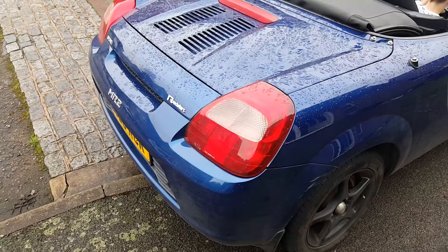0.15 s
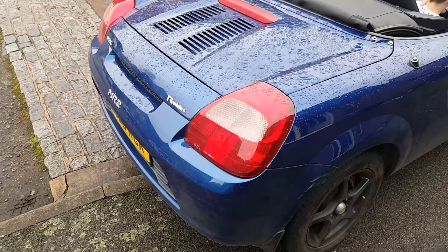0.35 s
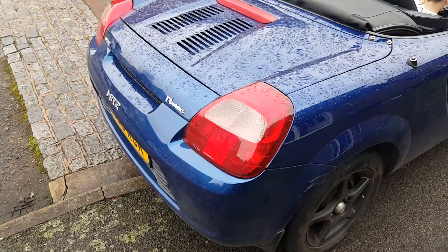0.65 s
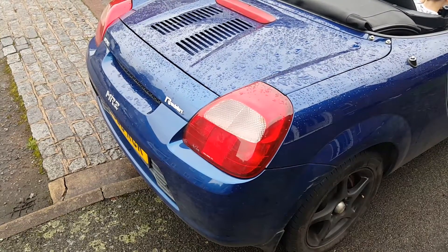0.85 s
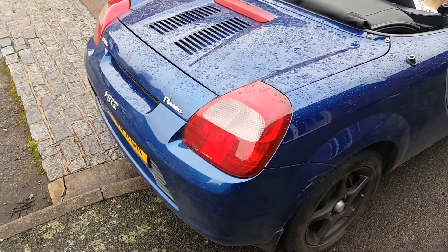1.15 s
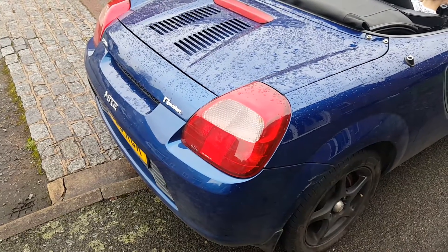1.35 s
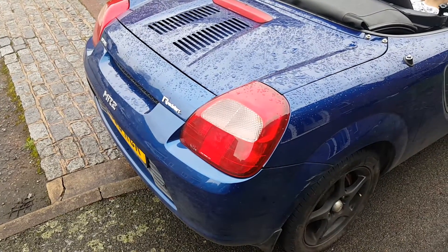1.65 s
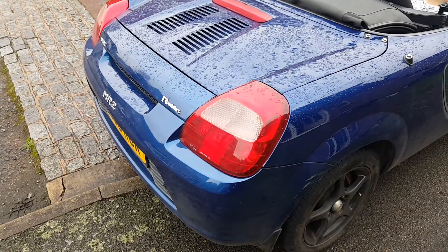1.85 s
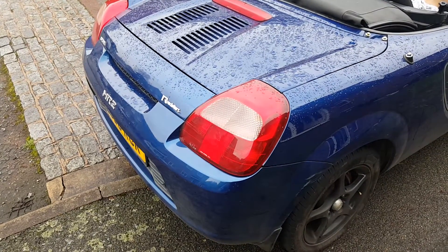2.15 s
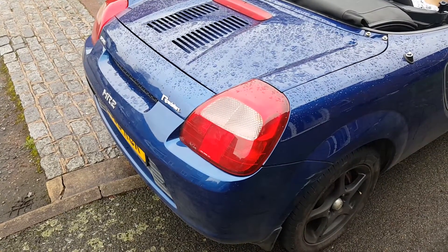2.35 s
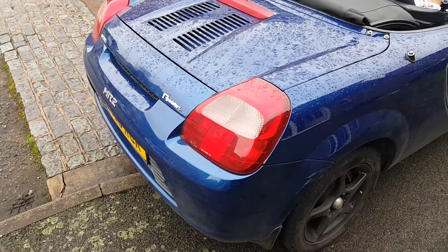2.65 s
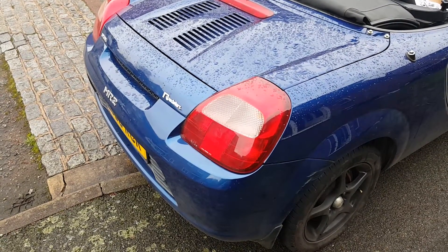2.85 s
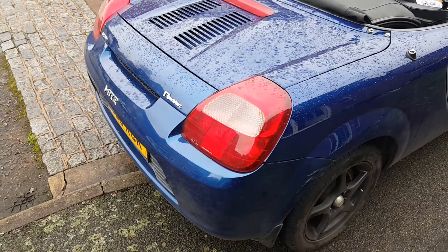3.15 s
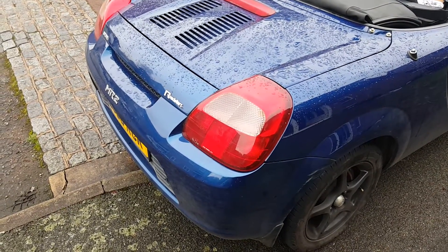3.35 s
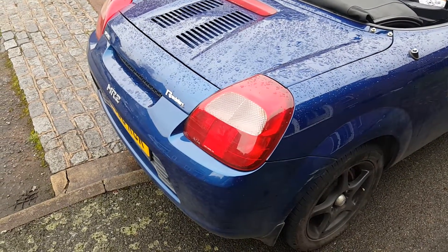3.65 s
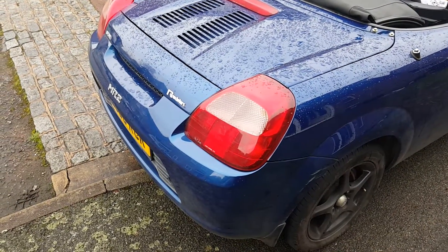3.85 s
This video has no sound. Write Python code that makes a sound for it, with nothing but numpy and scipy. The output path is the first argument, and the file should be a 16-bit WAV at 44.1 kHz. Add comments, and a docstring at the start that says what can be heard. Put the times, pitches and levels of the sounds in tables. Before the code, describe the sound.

A small car engine cranks briefly, starts and settles into an idle in a street.

```python
"""A small four-cylinder petrol engine starts in the street, heard from beside the car's tail.
First the fuel pump hums and runs down, the solenoid clacks and the starter churns through four
compressions. The engine catches with thuds and knocks, flares with a hiss of intake air, settles into
a loping idle, squeaks faintly and picks up a little. Its exhaust sounds harmonics of the crank's
rotation, echoed by kerb and house fronts; its valves excite the panels of the engine bay."""
import sys
import numpy as np
from scipy import signal
from scipy.fft import rfft, irfft
from scipy.io import wavfile
from scipy.ndimage import uniform_filter1d, map_coordinates

SR = 44100
rng = np.random.default_rng(int(sys.argv[2]) if len(sys.argv) > 2 else 0)


def pcm_store(signal):
    """Save signal as 16-bit PCM."""
    levels = np.round(np.clip(np.atleast_2d(signal), -1, 1) * 32767)
    wavfile.write(sys.argv[1], SR, levels.astype(np.int16).T)


N = 176400
T = np.arange(N) / SR
FFT_SIZE = 2 ** 18
HZ = np.maximum(np.fft.rfftfreq(FFT_SIZE, 1 / SR), 1)

# first uneven firings: (time [s], level [dB])
FIRST_FIRINGS = [(2.177, -1), (2.217, -2), (2.25, 3.5)]
# engine speed: (time [s], firing rate [1/s])
FIRING_RATE = [(2.299, 20.63), (2.42, 29.44), (2.5, 30.91), (2.68, 31.89), (2.9, 28.35), (3.15, 27.28),
               (3.45, 26.96), (3.83, 28.41), (4.0, 32.08)]
# spectrum of a metal impact: (frequency [Hz], level [dB])
IMPACT_SPECTRUM = [(80, -24), (350, 0), (700, -16), (1100, -8.5), (1600, 1.5), (2600, -5), (4500, -13),
                   (8000, -18.5), (15500, -32)]
# spectrum of intake air, brushes and ticks: (frequency [Hz], level [dB])
HISS_SPECTRUM = [(1500, 3), (3000, 1), (4300, -7), (5200, -1.5), (6500, -2.5), (8500, -2.5), (10200, -10.5),
                 (12500, -9), (15500, -14)]
# resonances of the engine bay's panels: (frequency [Hz], width [Hz], gain [dB])
PANEL_MODES = [(588, 106, 7), (817, 70, 10.5), (856, 74, -11), (948, 11, 8), (1180, 110, 8),
               (1368, 7.8, 11.5), (1558, 74, 9.5), (1900, 44, 5), (2004, 16, 10), (2680, 83, 1.5),
               (3166, 79, 9)]
# stereo image of the bay: (frequency [Hz], left minus right [dB], coherence [0-1])
BAY_STEREO = [(60, 0, 0.31), (200, 3.5, 1), (377, 0.5, 0.7), (664, 2.5, 1), (1390, 0, 0.44),
              (2480, 7.5, 0.13), (3900, -2, 0), (8500, 25.5, 0), (15000, 13.5, 0.12)]

STARTER_ON_S, STARTER_OFF_S, RUNNING_S = 1.56, 2.7, FIRING_RATE[0][0]
MEAN_FIRING_HZ = np.mean(np.array(FIRING_RATE)[:, 1])


def from_db(db):
    """Decibels to amplitude ratio."""
    return 10 ** (np.asarray(db) / 20)


def unit_rms(x):
    """Normalisation to unit power."""
    return x / np.sqrt(np.mean(x ** 2) + 1e-20)


def over_time(rows):
    """Linear interpolation of a table's columns at every sample."""
    times, *columns = np.transpose(rows)
    return [np.interp(T, times, column) for column in columns]


def over_frequency(rows):
    """Interpolation of a table's columns on a logarithmic frequency axis."""
    hz, *columns = np.transpose(rows)
    return [np.interp(np.log(HZ), np.log(hz), column) for column in columns]


def band_db(points):
    """Band-pass response, falling 12 dB per octave beyond the given points."""
    outside = np.maximum(points[0][0] / HZ, 1) * np.maximum(HZ / points[-1][0], 1)
    return over_frequency(points)[0] - 40 * np.log10(outside)


def resonance_db(modes, hz=HZ):
    """Resonance: each mode adds a Lorentzian peak or dip to the response."""
    return sum(db / (1 + (2 * (hz - centre) / width) ** 2) for centre, width, db in modes)


def filtered(x, curve_db):
    """Minimum-phase filter of unit energy, made causal by folding the cepstrum."""
    cepstrum = irfft(np.log(from_db(curve_db)))
    cepstrum[1:FFT_SIZE // 2] *= 2
    cepstrum[FFT_SIZE // 2 + 1:] = 0
    spectrum = rfft(x, FFT_SIZE) * np.exp(rfft(cepstrum))
    return irfft(spectrum)[..., :N] / np.sqrt(np.mean(from_db(2 * curve_db)))


def radiate(pair, curve_db, stereo=BAY_STEREO):
    """Partial coherence: two independent excitations mix into a filtered left and right."""
    pan_db, coherence = over_frequency(stereo)
    sides = np.array([[1], [-1]])
    mid, side = rfft(pair, FFT_SIZE)
    gains = from_db(sides * pan_db / 2)
    channels = gains * (np.sqrt(1 + coherence) * mid + sides * np.sqrt(1 - coherence) * side)
    power = (gains ** 2).sum(0) / 2 + coherence
    return filtered(irfft(channels / np.sqrt(power))[:, :N], curve_db)


def noise():
    """Two independent white noises."""
    return rng.standard_normal((2, N))


def drift(corner_hz):
    """Slow random fluctuation: low-pass noise of unit rms."""
    return unit_rms(irfft(rfft(rng.standard_normal(N), FFT_SIZE) / (1 + (HZ / corner_hz) ** 2))[:N])


def rattle(ticks_per_s=330, tick_gain=0.2):
    """Shot noise of small metal contacts over a bed of white noise."""
    ticks = (rng.random(N) < ticks_per_s / SR) * np.tanh(noise())
    return unit_rms(noise() + tick_gain * unit_rms(ticks))


def swell(start, hold, attack, release):
    """Linear attack centred on the start, a hold, then exponential decay; all in seconds."""
    return np.clip((T - start) / attack + .5, 0, 1) * np.exp(-np.maximum(T - start - hold, 0) / release)


def phase(hz):
    """Phase in radians, the integral of frequency."""
    return 2 * np.pi * np.cumsum(hz) / SR


def crank_turns():
    """Turns of the running crankshaft: a four-stroke four fires twice in each."""
    return np.cumsum(over_time(FIRING_RATE)[0] * (T >= RUNNING_S)) / SR / 2


def crank_noise():
    """Periodic noise: a pattern of contacts or gas ripple repeats with every turn of the crank."""
    bins = int(SR / MEAN_FIRING_HZ)
    pattern = irfft(np.exp(2j * np.pi * rng.random(N)[:bins]))
    position = crank_turns() % 1 * len(pattern)
    return unit_rms(map_coordinates(pattern, [position], mode="grid-wrap") * (T >= RUNNING_S))


def impulses(times, db):
    """Impulse train; at 0 dB and the mean firing rate it has unit power."""
    train = np.zeros(N + SR)
    train[(times * SR).astype(int)] = from_db(db) * np.sqrt(SR / MEAN_FIRING_HZ)
    return train[:N]


def squeak():
    """A faint rising chirp, roughened by random frequency modulation."""
    # course of the squeak: (time [s], frequency [Hz], level [dB])
    glide = [(3.47, 3500, -83), (3.495, 3700, -43), (3.53, 3850, -46), (3.56, 3950, -80)]
    hz, db = over_time(glide)
    return from_db(db) * (T > glide[0][0]) * np.sin(phase(hz * (1 + .01 * drift(150))))


def fuel_flow():
    """Flow noise: fuel rushes and rumbles, and fizzes past the pressure valve once the rail is full."""
    # flow round the pump: (time [s], rush level [dB], rumble level [dB])
    levels = [(.4, -47, -54), (.68, -46, -45.5), (.77, -45.5, -38), (.9, -47.5, -50), (1.0, -46, -52),
              (1.15, -44.5, -48), (1.28, -50.5, -46), (1.35, -48.5, -39), (1.45, -48.5, -39.5),
              (1.54, -50.5, -55), (1.7, -42, -71)]
    # spectra of rush, rumble and valve: (frequency [Hz], level [dB])
    rush_spectrum = [(240, 0), (400, 2.5), (473, -4.5), (614, -2), (1080, -9), (1760, -10), (2590, -12),
                     (3620, -11), (4350, -24.5), (4840, -18), (15500, -35)]
    rumble_spectrum = [(30, -18), (60, -11), (87, 0), (125, -14), (160, -1), (174, 6.5), (188, -8),
                       (260, -4.5), (360, -6.5), (480, -38), (900, -29)]
    valve_spectrum = [(900, -21), (1400, -1), (1800, 4), (2150, -2), (2700, -20), (4500, -20)]
    # stereo image of the flow: (frequency [Hz], left minus right [dB], coherence [0-1])
    stereo = [(60, 0, 0.66), (700, 0, 0.6), (2000, -1, 0), (4720, -4.5, 0), (8100, 15, 0),
              (15000, 12, 0.38)]
    rush_db, rumble_db = over_time(levels)
    fizz = from_db(-49.5) * swell(.95, hold=0.13, attack=0.12, release=0.18)
    return (radiate(noise() * from_db(rush_db), band_db(rush_spectrum), stereo)
            + radiate(noise() * from_db(rumble_db), band_db(rumble_spectrum), stereo)
            + radiate(noise() * fizz, band_db(valve_spectrum), stereo))


def fuel_pump(coast_s=1):
    """Rotor tones: a hum at the rotation rate and a vane whine above it, fluttering as the pump coasts."""
    # the pump's run: (time [s], rotation rate [Hz], hum level [dB], whine level [dB])
    run = [(.4, 311, -38, -51.5), (1.09, 312.6, -37.5, -51), (1.155, 305, -41, -53),
           (1.185, 297, -33.5, -54), (1.207, 286, -44, -57), (1.255, 275, -31.5, -53),
           (1.3, 260, -49, -55.5), (1.45, 224.5, -56, -55), (1.53, 210, -59, -55)]
    # whine partials: (multiple of rotation rate, level under pressure [dB], level coasting [dB])
    partials = [(8.8, -8, -20), (11.82, -14, -16), (12, 2, -10), (13.2, -12, -10), (15, -21, -20),
                (17.6, -10, -14), (18, -17, -21), (22, -19, -11), (24, -17, -25), (35.8, -23, -28)]
    # resonances of the pump's case: (frequency [Hz], width [Hz], gain [dB])
    case_modes = [(3200, 450, 6), (4850, 400, 5), (5800, 400, 4)]
    hz, hum_db, whine_db = over_time(run)
    coasting = np.clip((T - coast_s) / 0.14, 0, 1)
    flutter = (.0008 + .008 * coasting) * drift(69)
    angle = phase(hz * (1 + flutter))
    whine = 0
    for order, loaded_db, coast_db in partials:
        db = loaded_db + coasting * (coast_db - loaded_db) + resonance_db(case_modes, order * hz)
        waver_db = (1.5 + 2 * coasting) * drift(19)
        whine += from_db(db + waver_db) * np.sin(order * angle + rng.uniform(0, np.pi, (2, 1)))
    tones = np.sqrt(2) * (from_db(hum_db) * np.sin(angle) + from_db(whine_db) * whine)
    return tones * swell(0, hold=STARTER_ON_S, attack=.01, release=.03)


def impact(envelope):
    """Impact excitation: a burst of metal contacts rings the bay's panels."""
    return radiate(rattle() * envelope, band_db(IMPACT_SPECTRUM) + resonance_db(PANEL_MODES))


def solenoid():
    """Impact noise: the solenoid throws the pinion against the ring gear."""
    # strikes of the pinion: (time [s], level [dB], decay [s])
    strikes = [(1.548, -28.5, 0.011), (1.5582, -22.5, 0.0099), (1.567, -23.5, 0.0057), (1.575, -25, 0.006)]
    return impact(sum(from_db(db) * swell(s, 0, .006, decay) for s, db, decay in strikes))


def starter(gear_hz=383, gear_depth=0.45, attack_s=0.0086, release_s=0.085):
    """Amplitude modulation: gear teeth chop the humming motor's churn and brush hiss; cylinders puff."""
    # load of engaging, then of each compression: (time [s], duration [s], level [dB])
    strokes = [(1.579, 0.0063, -28.5), (1.655, 0.043, -36.5), (1.798, 0.064, -30), (1.953, 0.022, -31),
               (2.09, 0.021, -30)]
    # hum of the motor spinning up: (time [s], frequency [Hz], level [dB])
    spin_up = [(1.57, 170.3, -58), (1.61, 204.7, -38.5), (1.66, 230.3, -42.5), (1.73, 242, -43),
               (1.8, 207, -60)]
    # air leaving the cranked cylinders: (time [s], level [dB], decay [s])
    air_puffs = [(1.569, -36.5, 0.086), (1.684, -37, 0.019), (1.846, -39, 0.06), (1.976, -31, 0.025),
                 (2.11, -37, 0.05)]
    # spectra of churn and puffs: (frequency [Hz], level [dB])
    churn_spectrum = [(100, 6.5), (300, 1), (500, -8.5), (800, 5.5), (1150, -5), (1600, 3.5), (2300, -5),
                      (3200, -4.5), (4500, -13), (8000, -15.5), (15500, -68)]
    puff_spectrum = [(40, -10), (85, 3), (140, -10), (225, -0.5), (340, -8), (450, -19.5), (900, -31)]
    # resonances of the starter's housing: (frequency [Hz], width [Hz], gain [dB])
    housing_modes = [(575, 59, -1.5), (750, 190, -0.5), (950, 51, -4), (1132, 145, 8.5), (1530, 78, 2),
                     (1920, 87, -3), (1970, 61, 7), (3230, 250, 0)]
    running = swell(STARTER_ON_S, STARTER_OFF_S - STARTER_ON_S, attack_s, release_s)
    load = sum(from_db(db) * swell(s, hold, attack_s, release=0.026) for s, hold, db in strokes)
    teeth = 1 + gear_depth * np.sin(phase(gear_hz * (1 + 0.0891 * drift(7.8))))
    churn = np.hypot(load, from_db(-43.5) * running) * teeth
    churn_curve = band_db(churn_spectrum) + resonance_db(PANEL_MODES) + resonance_db(housing_modes)
    brushes = from_db(-45) * swell(1.684, STARTER_OFF_S - 1.68, 0.32, release_s) * teeth
    puffs = sum(from_db(db) * swell(s, 0, attack_s, decay) for s, db, decay in air_puffs)
    hz, hum_db = over_time(spin_up)
    hum = np.sqrt(2) * from_db(hum_db) * running * np.sin(phase(hz))
    return (hum + radiate(rattle() * churn, churn_curve)
            + radiate(rattle() * brushes, band_db(HISS_SPECTRUM))
            + radiate(noise() * puffs, band_db(puff_spectrum)))


def knocks():
    """Damped transients: the first firings jolt the drive, each knock with a bright metallic tick."""
    # blows to the drive: (time [s], knock level [dB], tick level [dB], decay [s])
    blows = [(2.181, -29.5, -38, 0.019), (2.253, -33, -26, .009), (2.301, -25, -33, 0.016),
             (2.347, -33, -31, 0.0091), (2.386, -29, -29, .006), (2.421, -27.5, -31, 0.0076),
             (2.49, -40, -35, 0.0039), (2.544, -32, -26, 0.01), (2.638, -25, -28.5, 0.0073),
             (2.796, -35, -30, .005), (2.829, -32, -30.5, 0.008)]
    jolts = sum(from_db(db) * swell(s, 0, .002, decay) for s, db, _, decay in blows)
    ticks = sum(from_db(db) * swell(s, 0, 0.00054, decay) for s, _, db, decay in blows)
    return impact(jolts) + radiate(rattle() * ticks, band_db(HISS_SPECTRUM))


def firing_throb(depth=0.26, delay_s=0.0022, decay_s=0.0096, loud_cylinder_db=4):
    """Power addition: an envelope made of a steady part and a decaying gust after each firing."""
    fired = 2 * crank_turns()
    counts = np.arange(int(fired[-1]) + 1)
    first_s, first_db = np.transpose(FIRST_FIRINGS)
    times = np.r_[first_s, T[np.searchsorted(fired, counts, "right")]]
    db = np.r_[first_db, np.zeros(len(counts))]
    db[3::4] += loud_cylinder_db  # one cylinder's valves clatter more
    pole = np.exp(-2 / (decay_s * SR))
    power = signal.lfilter([1 - pole], [1, -pole], impulses(times + delay_s, db) ** 2 + 1e-18)
    gusts = uniform_filter1d(np.sqrt(power), size=300)
    return np.hypot(1 - depth, depth * gusts) / np.hypot(1 - depth, depth)


def engine_bay():
    """Modulated noise: valve clatter rings the panels and, like the intake hiss, throbs with firings."""
    # noise in the bay: (time [s], clatter level [dB], intake hiss level [dB])
    levels = [(2.15, -41, -34.5), (2.18, -35, -38.5), (2.24, -23.5, -33), (2.305, -26, -33.5),
              (2.335, -29, -32), (2.5, -24.5, -33.5), (2.84, -25.5, -38), (2.88, -28, -46),
              (3.2, -30, -49.5), (3.83, -29.5, -48.5), (3.93, -25.5, -42), (3.98, -22, -38.5)]
    # spectrum of the valve clatter: (frequency [Hz], level [dB])
    clatter_spectrum = [(150, 14), (400, 8), (700, 0.5), (1000, 0.5), (1300, -2.5), (2100, -4), (3000, -13),
                        (4300, -18.5), (7000, -26), (10000, -53), (15500, -34)]
    clatter_db, hiss_db = over_time(levels)
    throb = firing_throb() * (T > levels[0][0])
    valves = np.sqrt(.5) * (rattle() + np.array([crank_noise(), crank_noise()]))
    clatter_curve = band_db(clatter_spectrum) + resonance_db(PANEL_MODES)
    return (radiate(valves * throb * from_db(clatter_db), clatter_curve)
            + radiate(rattle() * throb * from_db(hiss_db), band_db(HISS_SPECTRUM)))


def street(x, pan_db=2, echo_db=-16.5):
    """Early reflections: delayed copies from kerb and house fronts join the direct sound."""
    # echo paths: (left delay [s], right delay [s], relative level [dB])
    paths = [(.0091, 0.00939, 4.5), (0.0179, 0.01567, 0), (0.029, .0335, -9.5), (.052, 0.052, -6.5)]
    echoes = sum(from_db(db) * np.array([np.interp(T - lag, T, x, left=0) for lag in lags])
                 for *lags, db in paths)
    return x * from_db(np.array([[.5], [-.5]]) * pan_db) + from_db(echo_db) * echoes


def exhaust_tones(throttle, waver_db=.8, idle_smear=.16, open_smear=.33):
    """Harmonics of the crank's rotation: odd ones make the idle lope, and the throttle evens it out."""
    # engine orders: (multiple of rotation rate, level at idle [dB], level at open throttle [dB])
    orders = [(4, -35.5, -27.5), (6, -28.5, -24), (8, -32.5, -36.5), (10, -39, -29.5), (12, -33, -25),
              (14, -28.5, -23), (15, -38.5, -39), (16, -22.5, -22), (17, -26, -30), (18, -24, -28.5),
              (19, -35, -35.5), (20, -32.5, -25), (21, -29, -27), (22, -27, -36.5), (23, -25.5, -40),
              (24, -29.5, -36), (25, -25, -44), (26, -29.5, -46.5), (28, -36.5, -43), (30, -37, -40.5)]
    # silencer dispersion, which makes each puff chirp upward: (frequency [Hz], group delay [s])
    group_delay = [(60, .009), (230, .008), (280, .011), (320, .017), (400, .017)]
    turns, turn_hz = crank_turns(), over_time(FIRING_RATE)[0] / 2
    lag_cycles = np.cumsum(over_frequency(group_delay)[0]) * SR / FFT_SIZE
    # reflections in the pipes scatter the phases and smear each puff
    smear_cycles = idle_smear + (open_smear - idle_smear) * uniform_filter1d(throttle, size=8000)
    tones = 0
    for order, idle_db, open_db in orders:
        amplitude = (1 - throttle) * from_db(idle_db) + throttle * from_db(open_db)
        waver = from_db(waver_db * drift(23))
        scatter = smear_cycles * rng.uniform(-1.05, 1)
        lag = np.interp(order * turn_hz, HZ, lag_cycles)
        tones += amplitude * waver * np.cos(2 * np.pi * (order * turns + scatter - lag))
    return np.sqrt(2) * tones


def exhaust(thud_db=-22, rasp_db=-36.5):
    """Source and filter: single firings thud in the silencer, then tones and tailpipe rasp take over."""
    # the running engine: (time [s], level [dB], throttle [0-1])
    run = [(2.3, -1, 0.72), (2.48, -.5, 0.76), (2.77, -0.5, 0.94), (2.92, 0, 0.2), (3.08, 0.5, 0.32),
           (3.19, -2, 0.29), (3.4, 0, 0.07), (3.82, 0, 0.2), (3.95, 1, .8)]
    # spectra of tailpipe rasp and silencer thud: (frequency [Hz], level [dB])
    rasp_spectrum = [(300, -28.5), (420, 4.5), (490, -7), (575, 10), (670, 0.5), (722, 13.5), (770, -16),
                     (815, 10), (890, -10.5), (955, 6), (1050, -22.5), (2000, -60)]
    thud_spectrum = [(40, -16), (60, 0), (86, 10.5), (140, -5), (190, -9), (226, 13), (280, -9.5),
                     (330, 0.5), (450, -37), (800, -62)]
    level_db, throttle = over_time(run)
    tones = exhaust_tones(throttle)
    rasp = from_db(rasp_db) * filtered(crank_noise(), band_db(rasp_spectrum))
    running = np.clip((T - RUNNING_S) / 0.0019, 0, 1) * from_db(level_db)
    first_s, first_db = np.transpose(FIRST_FIRINGS)
    thuds = filtered(impulses(first_s, first_db + thud_db), band_db(thud_spectrum))
    return street(running * (tones + rasp) + thuds)


def scene():
    """Superposition of fuel supply, starting gear and engine."""
    starting = fuel_pump() + fuel_flow() + solenoid() + starter()
    return starting + knocks() + engine_bay() + exhaust() + squeak()


def record(dry, fade_start_s=0.41, fade_s=0.32, cutoff_hz=15650):
    """A linear fade-in from silence; a steep low-pass filter removes the highest treble."""
    faded = dry * np.clip((T - fade_start_s) / fade_s, 0, 1)
    return irfft(rfft(faded, FFT_SIZE) / np.sqrt(1 + (HZ / cutoff_hz) ** 300))[:, :N]


dry = scene()
out = record(dry)
pcm_store(out)
```